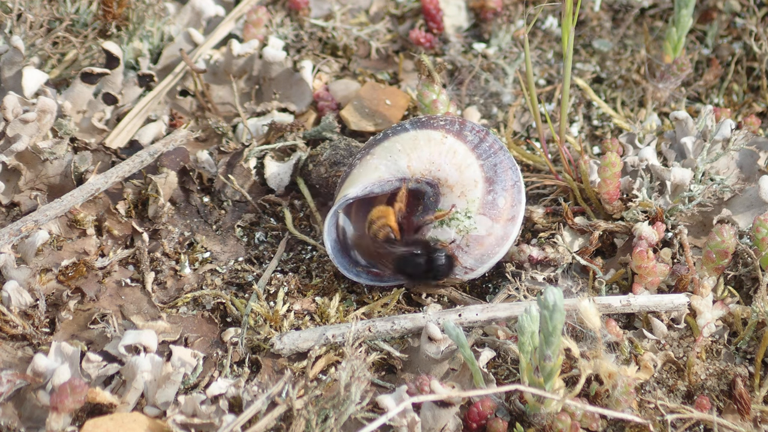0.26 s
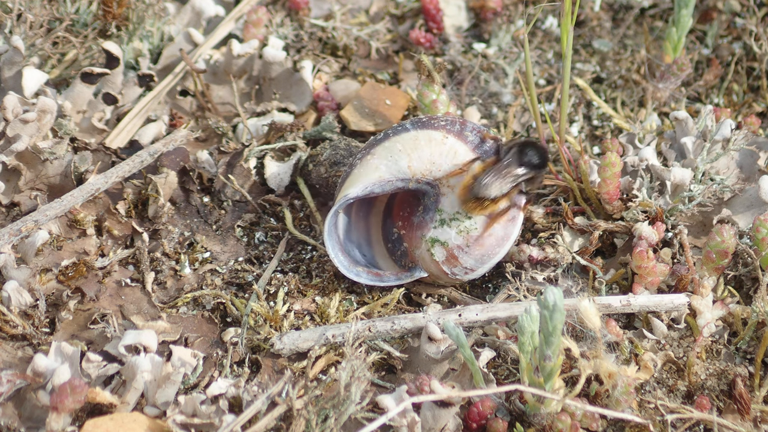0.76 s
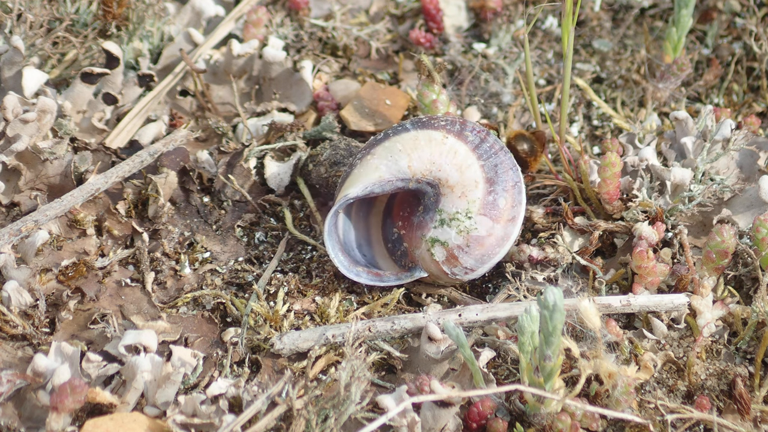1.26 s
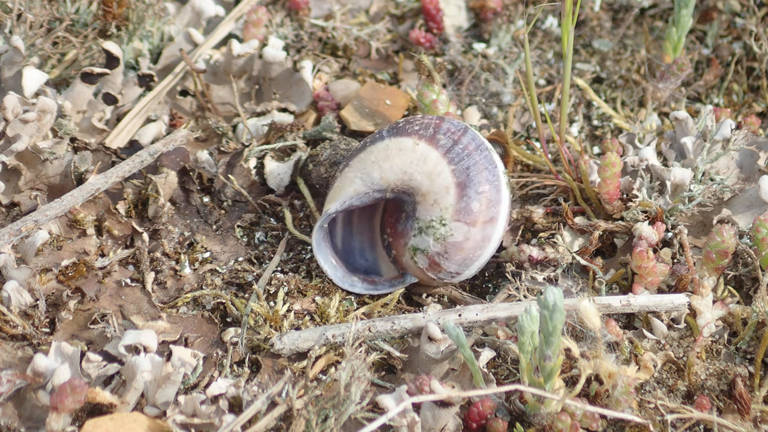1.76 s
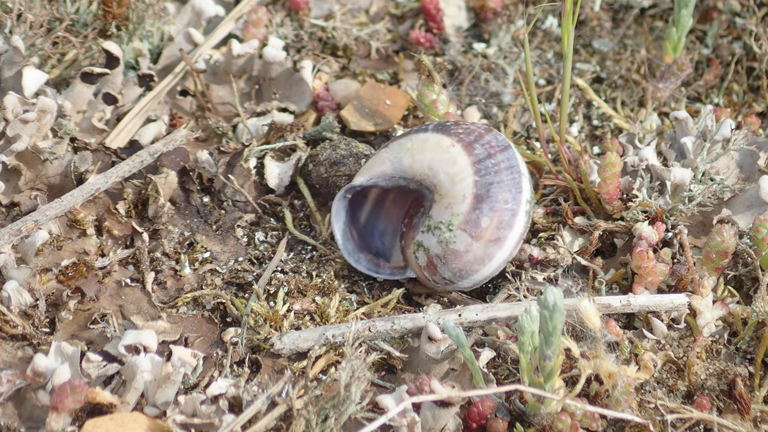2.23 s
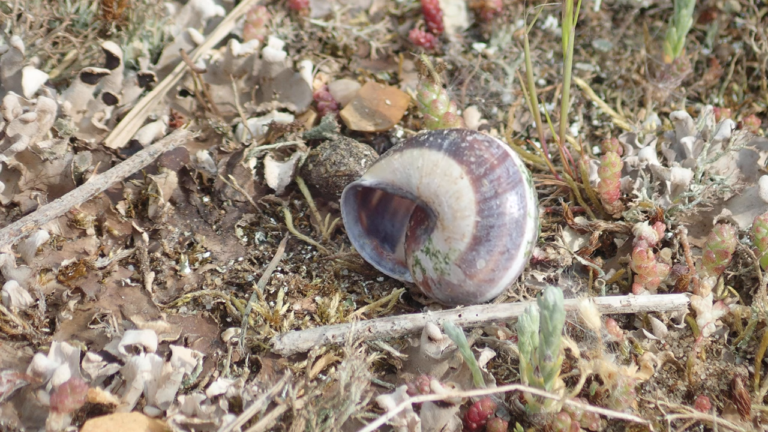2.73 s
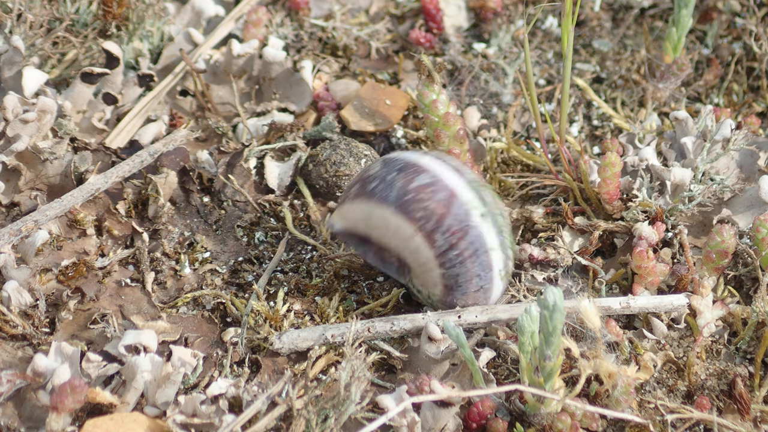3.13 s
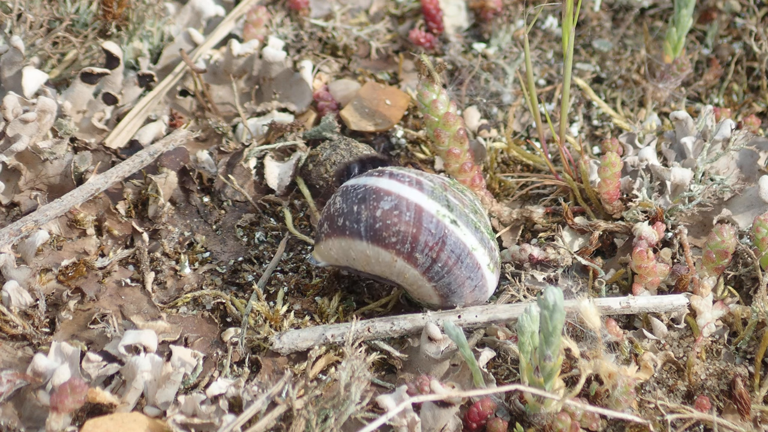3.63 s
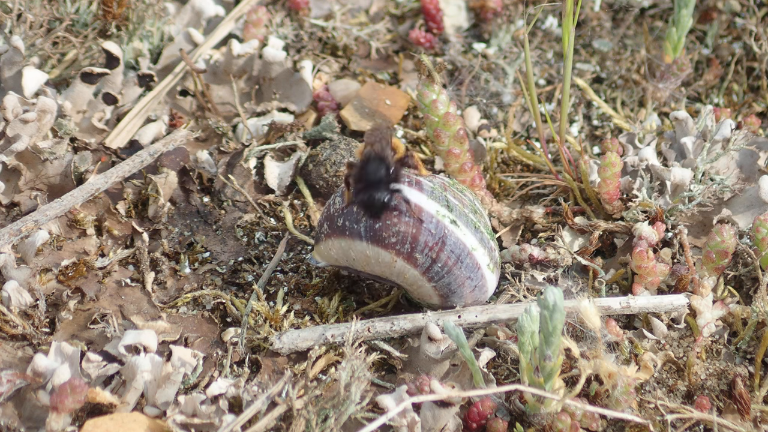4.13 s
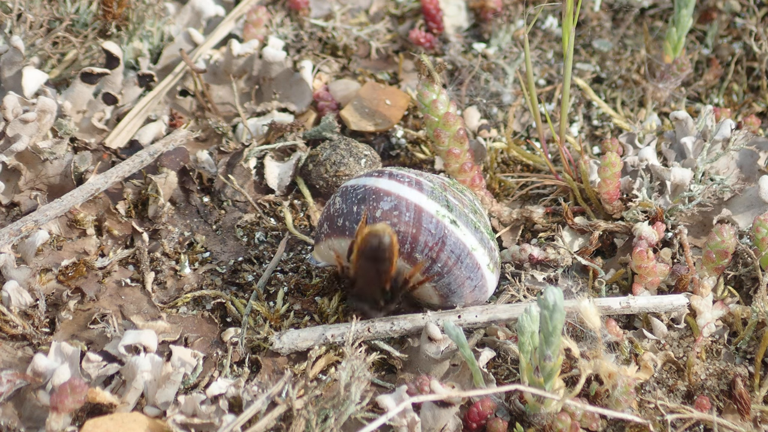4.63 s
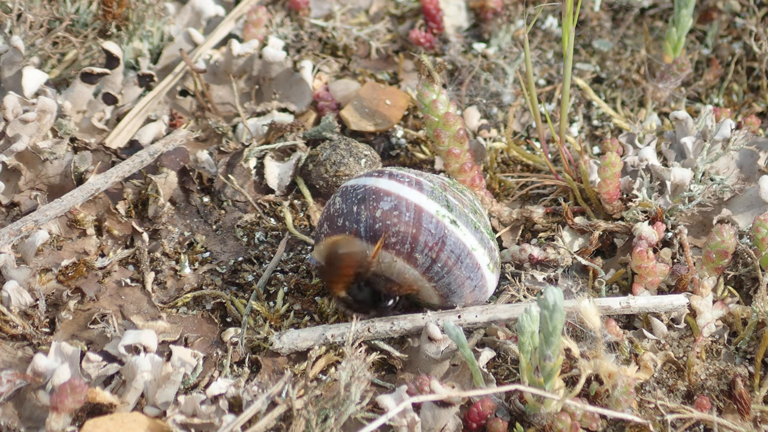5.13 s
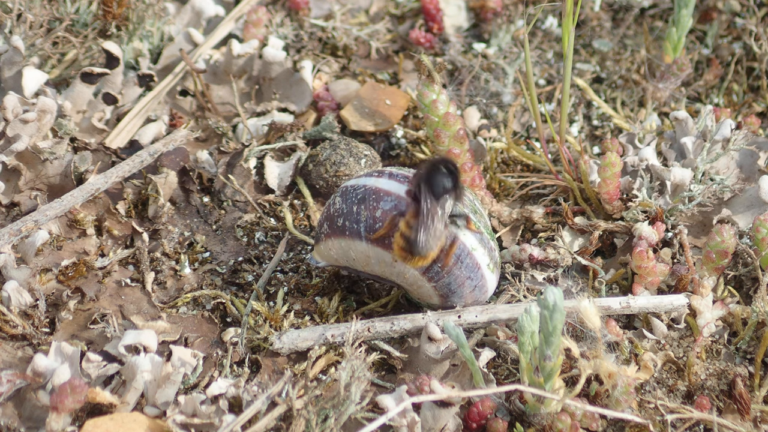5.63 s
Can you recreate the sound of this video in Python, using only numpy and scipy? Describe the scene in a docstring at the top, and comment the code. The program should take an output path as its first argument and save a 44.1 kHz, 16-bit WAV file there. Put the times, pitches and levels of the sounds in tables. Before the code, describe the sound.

Outdoors on a breezy day, wind strikes a small stereo microphone at close range. From 0 s, low rumbling turbulence comes in irregular bursts, strongest around 0.4-0.7 s and again near 1.2 s, with dull single thumps leaning left or right. Weaker gusts continue to about 3.2 s, then die away, with a few very faint thumps up to 3.8 s. Far-off birds chirp throughout: a buzzy high note at the start, short whistles and trills through 3.8 s, then sparser, tiny chips, including several around 5.3-5.9 s. A lower, hoarse, wavering whistle appears near 0.7, 1.3 and 1.7 s, returns at 3.0-3.5 s, and makes a quick cluster at 3.8-4.3 s. Once the wind drops, a faint steady low hum shows through a soft low wash. Fine high hiss lies over everything. Around 5.6 s the air stirs weakly. The bee and shell make no distinct sound.

```python
"""Open stony ground on a breezy day, heard through a small stereo camera.
Gusts, turbulence noise in three eddy sizes, buffet the microphone for three seconds, with single thumps.
They then die away, baring a faint low hum of two sine partials; the air stirs weakly near the end.
Far off, birds chirp and buzz (frequency-modulated tones); a lower caller gives hoarse, wavering whistles.
A wash of low noise lies behind, and a steady high hiss over it all."""
import sys
import numpy as np
from scipy import signal
from scipy.fft import rfft, irfft
from scipy.io import wavfile

SR = 44100
rng = np.random.default_rng(int(sys.argv[2]) if len(sys.argv) > 2 else 0)


def inscribe(sig):
    """Save sig as 16-bit PCM at rate SR to the path in sys.argv[1].

    A 1-D sig is mono; a 2-D sig holds one channel per row.
    Samples are clipped to [-1, 1] before scaling.
    """
    pcm = np.round(np.clip(np.atleast_2d(sig).T, -1, 1) * 32767)
    wavfile.write(sys.argv[1], SR, pcm.astype(np.int16))


N = 259749
TIME = np.arange(N) / SR
BINS = np.fft.rfftfreq(N, 1 / SR)


def gain_of(db):
    """Amplitude ratio: twenty decibels are a factor of ten."""
    return 10 ** (np.asarray(db) / 20)


def evened(x):
    """Normalisation: scales a signal to an rms of one."""
    return x / np.sqrt(np.mean(x ** 2) + 1e-20)


def read(points):
    """Spectral envelope: a table interpolated over log frequency at every bin."""
    hz, value = np.transpose(points)
    return np.interp(np.log(BINS + 1), np.log(hz + 1), value)


def add(mix, start, sound):
    """Superposition: adds a sound into the mix at a start time in seconds."""
    part = mix[..., max(round(start * SR), 0):][..., :sound.shape[-1]]
    part += sound[..., :part.shape[-1]]


def wander(hz):
    """Low-passed noise of rms one: chance fluctuation under a Gaussian spectrum of width hz."""
    spectrum = rfft(rng.standard_normal(N)) * np.exp(-(BINS / hz) ** 2)
    return evened(irfft(spectrum, N))


def noise(colour, likeness=0):
    """Partly coherent stereo noise: shaped in frequency, with a mid signal of rms one."""
    left, other = rfft(rng.standard_normal((2, N)))
    same = np.clip(likeness, -1, 1)
    right = same * left + np.sqrt(1 - same ** 2) * other
    pair = irfft(np.array([left, right]) * gain_of(read(colour)), N)
    return pair / pair.mean(0).std()


def far_away(x, direct_db, echo_db, t60):
    """Scattering: direct sound plus sparse echoes off scrub and stones, decaying 60 dB in t60 seconds."""
    t = np.arange(SR) / SR
    present = rng.random((2, SR)) < 1500 / SR  # about 1500 echoes a second
    taps = rng.standard_normal((2, SR)) * present * gain_of(-60 * t / t60)
    taps /= np.linalg.norm(taps, axis=1, keepdims=True)
    # each ear hears its own echoes and, more weakly, the other's
    tails = evened(taps + .5 * taps[::-1]) / np.sqrt(SR)
    echoes = signal.fftconvolve(x[None], tails, axes=1)[:, :N]
    return gain_of(direct_db) * x + gain_of(echo_db) * echoes


# spectrum of the far wash of the countryside: (frequency [Hz], relative spectral level [dB])
WASH_COLOUR = [(15, -30), (35, -7), (60, -7.5), (105, -2), (200, -4), (420, -7.5), (560, -8), (680, -16.5),
               (820, -10.5), (1200, -11.5), (1700, -17), (2200, -25), (2500, -37), (3800, -44.5)]
# spectrum of the high hiss: (frequency [Hz], relative spectral level [dB])
HISS_COLOUR = [(2300, -28), (3200, -26.5), (3700, -20.5), (4250, -19.5), (4720, -8.5), (5600, -4.5),
               (6600, -1.1), (7500, -5.5), (8500, 0.5), (9300, 0), (10000, -8), (10500, -12), (16000, -12)]
# coherence of the two channels: (frequency [Hz], left-right likeness [0-1])
STEREO_LIKENESS = [(40, 0.45), (130, 0.4), (600, 0.23), (1500, 0.073), (3000, 0.62), (5000, 0.12),
                   (9000, 0)]


def background(wash_db=-54.5, hiss_db=-54):
    """Stationary broadband noise: a low wash and a high hiss, alike in both ears by frequency."""
    likeness = read(STEREO_LIKENESS)
    wash = gain_of(wash_db) * noise(WASH_COLOUR, likeness)
    hiss = gain_of(hiss_db) * noise(HISS_COLOUR, likeness)
    return wash + hiss


# partials of the drone: (frequency before drift [Hz], rms level before wavering [dB])
HUM_PARTIALS = [(121, -56.5), (242, -66.5)]


def hum(drift=0.00769, waver_db=1.5):
    """Harmonic tone: two sine partials drift together in pitch and waver separately in level."""
    warped_time = np.cumsum(1 + drift * wander(2.69)) / SR
    out = np.zeros(N)
    for hz, db in HUM_PARTIALS:
        level = gain_of(db + waver_db * wander(3))
        out += level * np.sin(2 * np.pi * hz * warped_time)
    return np.sqrt(2) * out


def glide(length, first_hz, last_hz, bend=0.7):
    """Decelerating glissando: a note has covered the share bend of its slide at half time."""
    u = np.linspace(0, 1, max(int(length * SR), 64))
    curve = np.polyfit([0, .5, 1], [0, bend, 1], 2)
    return u * length, first_hz + (last_hz - first_hz) * np.polyval(curve, u)


# birds' notes strewn at random, lower and higher:
# (from [s], to [s], central pitch [Hz], central note length [s], largest slide either way [share of pitch])
LOW_CHATTER_SPAN = (0.4, 4.3, 3450, 0.09, 0.04)
HIGH_CHATTER_SPAN = (3.7, 5.89, 4950, 0.035, 0.07)


def chatter(start, end, hz, length, slide, db, count, spread=0.1, spread_db=3.5):
    """Jittered timing: loosely spaced, buzz-free notes sliding up or down, as rows like the chirps'."""
    late, long, high, steep, loud = rng.uniform(-1, 1, (count, 5)).T
    starts = start + (end - start) * (np.arange(count) + .5 + .5 * late) / count
    lengths = length * 2 ** long
    pitch = hz * (1 + spread * high)
    step = slide * steep
    levels = db + spread_db * loud
    return list(zip(starts, lengths, pitch * (1 - step), pitch * (1 + step), levels, np.zeros(count)))


# birds' whistled and buzzing notes, loud and faint: (time [s], length [s], first pitch [Hz],
# last pitch [Hz], rms level before flicker and distance [dB], relative buzz depth [share of pitch])
CHIRP_NOTES = [(0.0, 0.12, 3970, 3830, -68, 0.022), (0.0, 0.3, 2860, 2760, -75.5, 0.044),
               (0.059, 0.32, 5000, 5320, -55, 0.088), (0.168, 0.23, 3270, 3210, -77.5, 0.01),
               (0.458, 0.086, 4870, 4750, -67, 0.025), (0.719, 0.1, 4400, 5200, -64.5, 0.093),
               (0.955, 0.092, 4790, 4950, -64, 0.041), (0.983, 0.036, 3150, 2900, -72, 0.01),
               (1.037, 0.12, 4950, 4640, -66, 0.052), (1.241, 0.095, 4850, 4940, -57, 0.029),
               (1.576, 0.026, 4200, 3480, -69, 0.011), (1.702, 0.052, 3590, 3830, -62, 0.018),
               (1.815, 0.084, 4900, 4320, -68, 0.01), (2.146, 0.16, 4440, 4550, -59, 0.0099),
               (2.275, 0.17, 4850, 4730, -63, 0.027), (2.454, 0.12, 5520, 5720, -59, 0.092),
               (2.872, 0.072, 3300, 4270, -71, 0.027), (2.906, 0.16, 4300, 5160, -59.5, 0.033),
               (3.088, 0.42, 3980, 4070, -68.5, 0.083), (3.154, 0.254, 5950, 5720, -63.5, 0.029),
               (3.449, 0.33, 4220, 4370, -68, 0.108), (3.509, 0.086, 4960, 5280, -59.5, 0.091),
               (4.065, 0.03, 4180, 4550, -67, 0.01), (4.474, 0.036, 4900, 4260, -72, 0.005),
               (4.542, 0.099, 5860, 5000, -63, 0.019), (5.317, 0.039, 4500, 5100, -66, 0.01),
               (5.466, 0.027, 4400, 5000, -63, 0.01), (5.54, 0.074, 5540, 5500, -61.5, 0.005),
               (5.858, 0.037, 5200, 4600, -63, 0.01)]


def chirps(buzz_scale_hz=150, rasp=0.5, flicker_db=1.5):
    """Frequency modulation: whistled notes, buzzy where the pitch shakes fast and unevenly."""
    out, shake = np.zeros(N), wander(673)
    notes = list(CHIRP_NOTES)
    notes += chatter(*LOW_CHATTER_SPAN, db=-77.5, count=10)
    notes += chatter(*HIGH_CHATTER_SPAN, db=-68, count=8)
    for start, length, first, last, db, buzz in notes:
        t, hz = glide(length, first, last)
        buzz_hz = buzz_scale_hz * (0.69 + .5 * rng.random())
        swing = np.sin(2 * np.pi * buzz_hz * t) + rasp * np.interp(start + t, TIME, shake)
        pitch = hz * (1 + buzz * swing / np.hypot(1, rasp))
        note = np.sin(2 * np.pi * np.cumsum(pitch) / SR)
        note = note * signal.windows.tukey(len(t), .5)
        add(out, start, gain_of(db) * evened(note))
    return out * gain_of(flicker_db * wander(28))


# the lower caller's whistles: (time [s], length [s], first pitch [Hz], last pitch [Hz],
# rms level before distance [dB], beat depth [0-1])
LOW_WHISTLE_NOTES = [(0.697, 0.098, 2070, 1885, -64, 0.35), (1.27, 0.26, 2170, 2300, -69.5, 0.5),
                     (1.718, 0.14, 2320, 2340, -72, 0.2), (3.031, 0.28, 2245, 2142, -66, 0.5),
                     (3.411, 0.039, 1975, 2020, -65, 0), (3.459, 0.085, 1860, 1820, -58, 0.03),
                     (3.841, 0.114, 2065, 2127, -60.5, 0.26), (3.977, 0.095, 2020, 1915, -64, 0.2),
                     (4.105, 0.086, 1960, 2193, -58, 0.27), (4.178, 0.13, 2145, 2007, -60, 0.5)]


def low_whistles(beat_hz=52, sweep_hz=70):
    """Joint amplitude and frequency modulation: hoarse, wavering whistles, most with an uneven beat."""
    out = np.zeros(N)
    pace = beat_hz * (1 + 0.19 * wander(27))
    hoarse = 1 + .013 * wander(260)
    for start, length, first, last, db, depth in LOW_WHISTLE_NOTES:
        t, hz = glide(length, first, last)
        beat = 2 * np.pi * np.cumsum(np.interp(start + t, TIME, pace)) / SR
        pitch = hz * np.interp(start + t, TIME, hoarse) + depth * sweep_hz * np.sin(beat)
        note = (1 - depth * np.cos(beat)) * np.sin(2 * np.pi * np.cumsum(pitch) / SR)
        note = note * signal.windows.tukey(len(t), .25)
        add(out, start, gain_of(db) * evened(note))
    return out


# single thumps of wind:
# (time before the common lag [s], relative level [dB], left-right level difference [dB])
THUMP_STRIKES = [(0.067, -12, -17), (0.137, -13, 12), (0.242, -16, 13), (0.597, -12.5, 1), (0.934, -15, 14),
                 (1.275, -10.5, -8), (1.529, -11, 4), (2.007, -17, -1), (2.32, -16, -12), (3.064, -25, 6),
                 (3.128, -20.5, 14), (3.751, -21.5, 17)]


def thumps(level_db=-5, mean_ring_hz=145, width=0.0044, lag=0.0031):
    """Damped pressure pulse: one eddy strikes the ports unequally and rocks for a cycle or two."""
    out, t = np.zeros((2, N)), np.arange(-2048, 2048) / SR
    for start, db, pan_db in THUMP_STRIKES:
        # each port has its own ringing pitch and phase
        hz = mean_ring_hz * (1 + 0.46 * (rng.random((2, 1)) - .5))
        phase = rng.random((2, 1))
        push = np.exp(-(t / width) ** 2) * np.cos(2 * np.pi * (hz * t + phase))
        sides = evened(gain_of(pan_db * np.array([[.5], [-.5]])))
        add(out, start + lag + t[0], gain_of(db + level_db) * sides * push)
    return out


def eddies(colour, span):
    """Incoherent turbulence at the two ports, its mid power held even over span seconds."""
    pair = noise(colour)
    window = signal.windows.hann(int(span * SR))
    power = signal.fftconvolve(pair.mean(0) ** 2, window / window.sum(), "same")
    return pair / np.sqrt(power + 1e-4)


# spectra of middling, small and large eddies: (frequency [Hz], relative spectral level [dB])
MID_COLOUR = [(50, -33), (75, -1.5), (100, 2), (155, 0.5), (205, -4.5), (250, -14), (340, -35), (800, -120)]
SMALL_COLOUR = [(140, -54), (200, -0.5), (250, 4.5), (310, -3), (400, -12), (520, -24), (700, -41.5),
                (2500, -110)]
LARGE_COLOUR = [(10, -38), (25, -49), (36, -10), (50, -4), (72, 0), (90, 7.5), (125, -13.5), (500, -120)]
# the breeze between gusts: (time [s], relative strength before flutter [dB])
BREEZE_STRENGTH = [(0, -31), (0.35, -36.5), (0.65, -37.5), (0.9, -41), (1.45, -33.5), (1.82, -43.5),
                   (2.15, -34), (2.6, -37), (3.0, -47), (3.35, -51), (3.75, -49.5), (3.95, -66),
                   (4.9, -67.5), (5.65, -53), (5.89, -59)]
# gusts: (start [s], length between half heights [s], relative strength before flutter [dB],
# relative share of small fast eddies [dB])
GUST_EVENTS = [(0.0, 0.089, -33.5, -1.5), (0.413, 0.027, -21, -17), (0.498, 0.027, -19, -17),
               (0.575, 0.048, -19.5, -10.5), (0.641, 0.13, -26.5, -7.5), (0.815, 0.045, -32.5, -3),
               (0.992, 0.11, -28.5, -21), (1.154, 0.15, -31, -17), (1.224, 0.066, -22, -5),
               (1.526, 0.079, -27, -6), (1.688, 0.055, -32, -11.5), (1.873, 0.17, -28, -8),
               (2.31, 0.035, -29, -10), (2.677, 0.079, -31.5, -16.5), (2.79, 0.11, -30.5, -5),
               (3.047, 0.18, -37, -15.5)]
# large slow eddies, fullest in a light wind: (joint wind strength [dB], relative share [dB])
LARGE_EDDY_SHARE = [(-65, -6.5), (-47.5, -0.5), (-36, -7), (-23, -16.5)]


def wind(mid_db=-5.5, small_db=-4.5, large_db=-1, flutter_db=3.5, gust_flutter_db=2.5):
    """Turbulent pressure: gust and breeze powers add, and their sum drives three sizes of eddy."""
    breeze_small_db, edge_s = -13.5, 0.022  # small eddies' share in the breeze; a gust's rise or fall
    flutter = wander(24)
    breeze_db = np.interp(TIME, *np.transpose(BREEZE_STRENGTH))
    power = gain_of(breeze_db + flutter_db * flutter) ** 2
    small_power = power * gain_of(breeze_small_db) ** 2
    ripple = gain_of(gust_flutter_db * flutter)
    for start, length, db, small_share_db in GUST_EVENTS:
        inside = np.minimum(TIME - start, start + length - TIME)  # seconds from the nearer edge
        gust = gain_of(db) * ripple * np.clip(.5 + inside / edge_s, 0, 1)
        power = power + gust ** 2
        small_power = small_power + (gust * gain_of(small_share_db)) ** 2
    large_share_db = np.interp(10 * np.log10(power), *np.transpose(LARGE_EDDY_SHARE))
    middling = gain_of(mid_db) * eddies(MID_COLOUR, span=0.055)
    large = gain_of(large_db + large_share_db) * eddies(LARGE_COLOUR, span=0.086)
    small = gain_of(small_db) * eddies(SMALL_COLOUR, span=0.15)
    return (middling + large) * np.sqrt(power) + small * np.sqrt(small_power)


def scene():
    """Superposition: the air behind, callers far off, and wind close by."""
    birds = far_away(chirps(), direct_db=-2.5, echo_db=-7.5, t60=.6)
    low_caller = far_away(low_whistles(), direct_db=-3, echo_db=-4.5, t60=.7)
    return background() + hum() + birds + low_caller + thumps() + wind()


def record(dry, bass_hz=34, edge_hz=15750):
    """Band limitation: the microphone's bass roll-off and the camera's upper limit."""
    roll_off = (1 + (bass_hz / (BINS + 1)) ** 6) ** -.5  # third-order slope
    thinned = irfft(rfft(dry) * roll_off, N)
    low_pass = signal.firwin(1023, edge_hz, window=("kaiser", 9), fs=SR)
    return signal.oaconvolve(thinned, low_pass[None], "same", axes=1)


dry = scene()
out = record(dry)
inscribe(out)
```